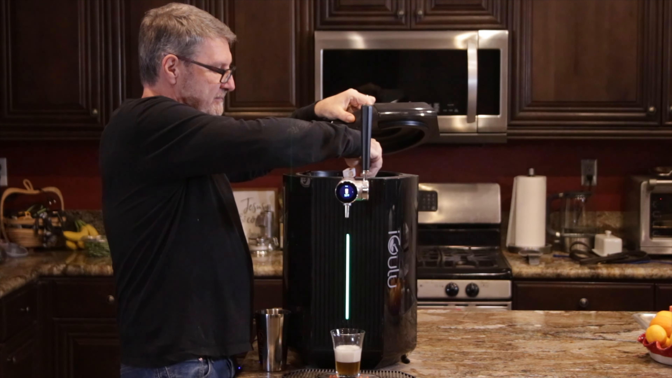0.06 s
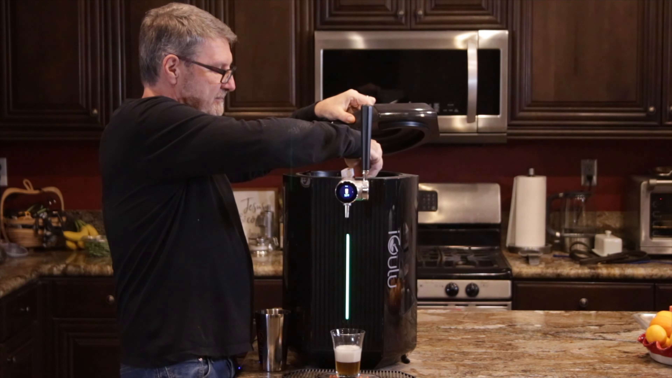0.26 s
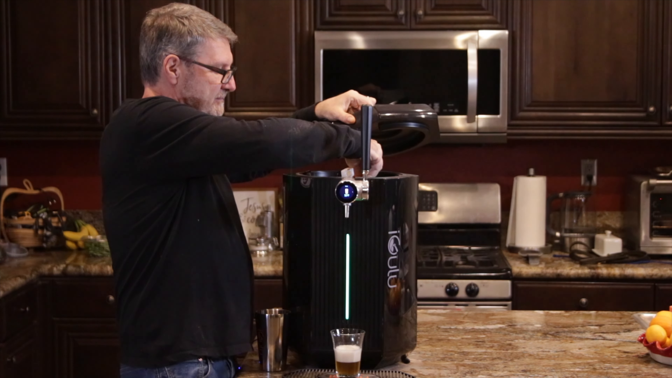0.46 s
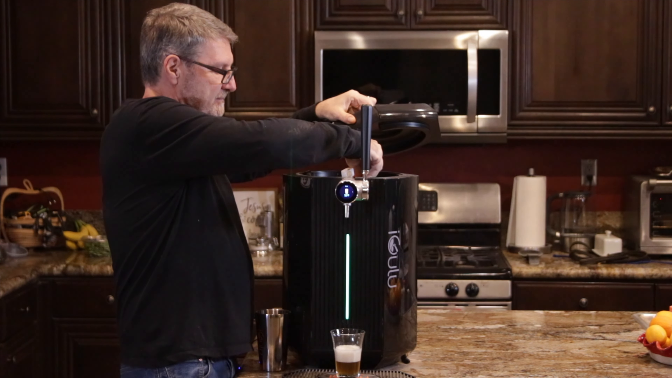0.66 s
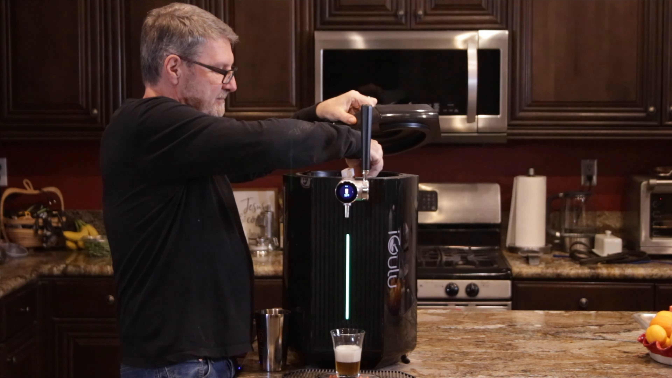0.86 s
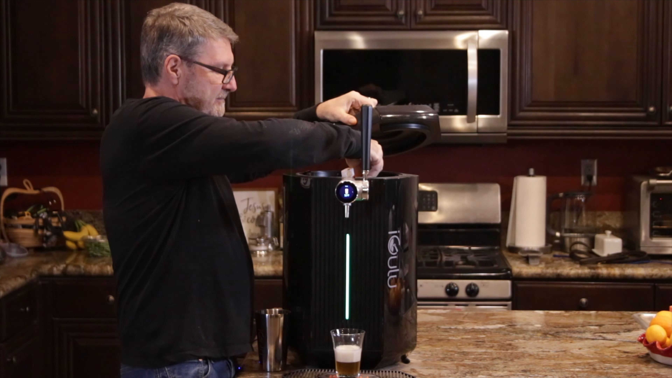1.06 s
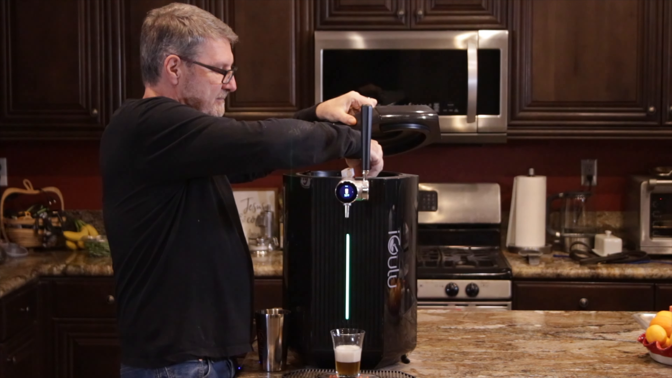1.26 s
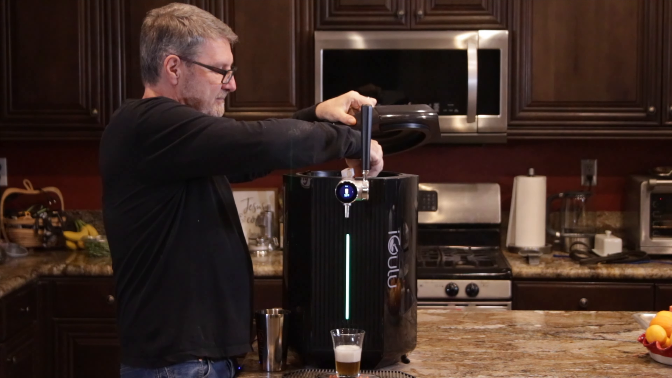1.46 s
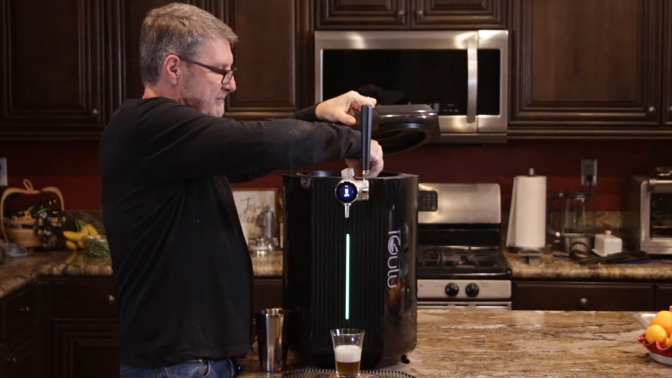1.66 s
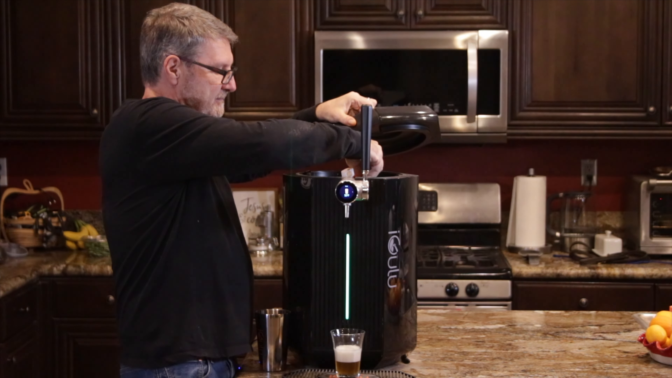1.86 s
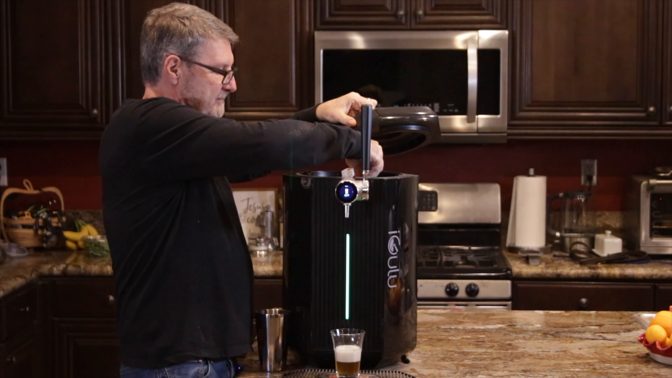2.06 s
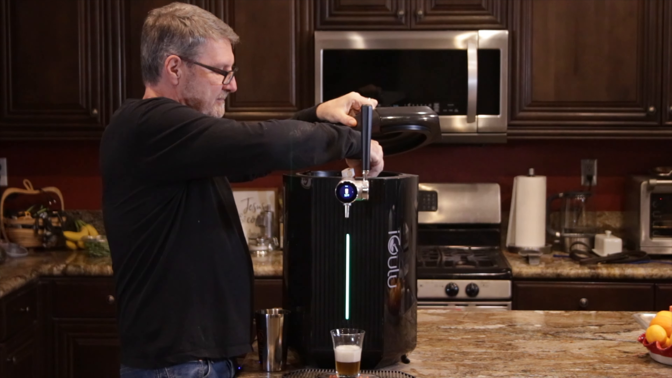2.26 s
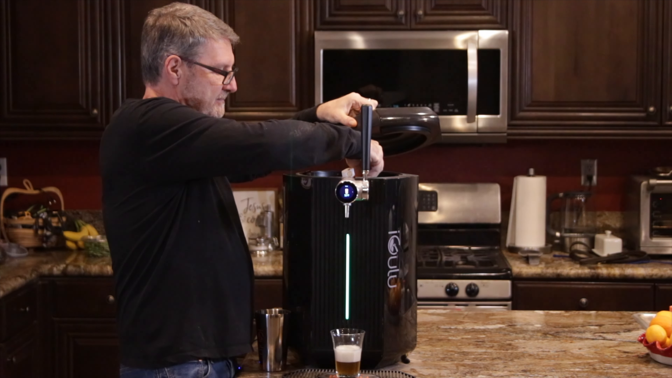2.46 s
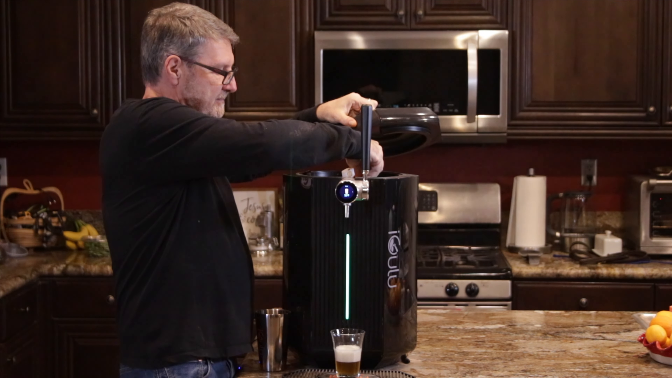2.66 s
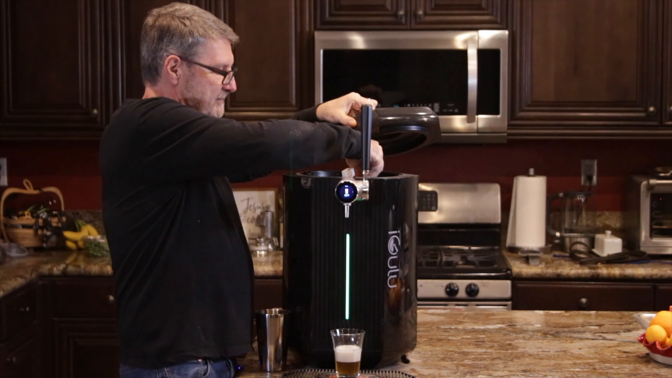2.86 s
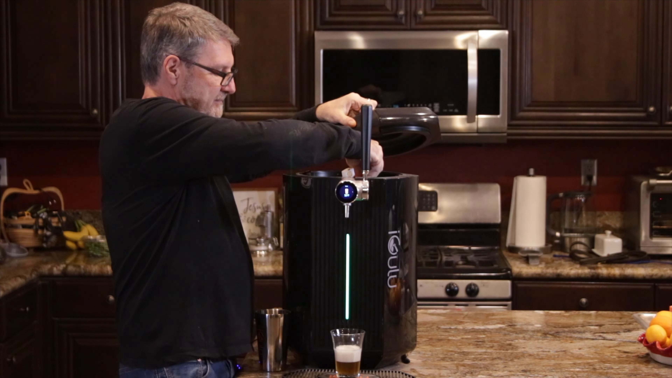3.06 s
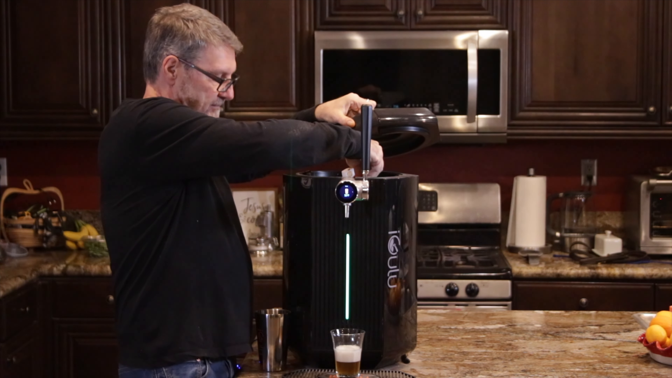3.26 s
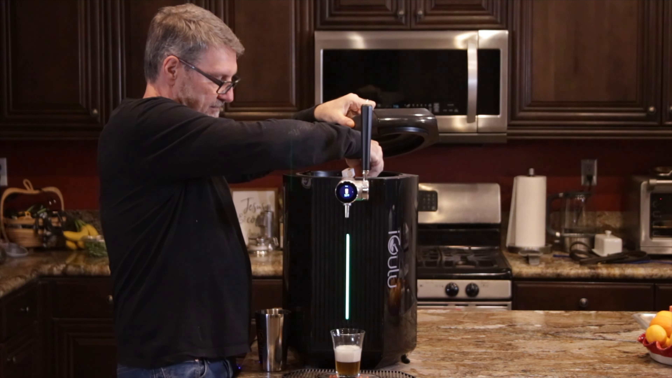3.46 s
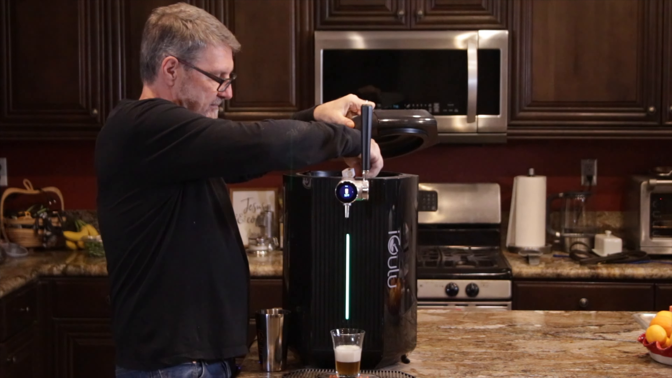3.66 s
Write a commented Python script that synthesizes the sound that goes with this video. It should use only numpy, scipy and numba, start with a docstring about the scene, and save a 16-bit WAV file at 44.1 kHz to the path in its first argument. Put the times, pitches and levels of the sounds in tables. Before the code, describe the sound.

Pressurised gas hisses from a keg tap. After faint hand rustle, it bursts out at about 0.2 s with a soft thump and spitting drops, then rushes bright and dense, slightly fluttering. Low foam churns beneath with a hollow ring; a thin wavering note faintly emerges after 1 s. Treble fades until the hiss shuts off near 3.45 s, followed by rustle, a dull thump at 3.6 s and quiet kitchen tone.

```python
"""Pressurised gas escapes from the tap of a brewing keg in a kitchen: it swells, spurts, hisses for three seconds and shuts off.
The jet is flickering noise and droplet clicks, strongest between 3.7 and 5.2 kHz in the valve band;
its treble fades as the pressure sinks, while a few high bands brighten in turn and stray drops spit.
Under it foam churns as low noise, a hollow resonance sounds and a thin wavering sine grows out of it.
Damped swings thump as the tap opens and closes; a hand rustles, over room tone and a short echo tail."""
import sys
import numpy as np
from scipy import signal
from scipy.fft import rfft, irfft
from scipy.io import wavfile
from scipy.ndimage import uniform_filter1d
from numba import njit

SR = 44100
rng = np.random.default_rng(int(sys.argv[2]) if len(sys.argv) > 2 else 0)


def int16_out(signal):
    """Quantize to a 16-bit WAV file."""
    q = np.round(np.clip(np.atleast_2d(signal).T, -1, 1) * 32767)
    wavfile.write(sys.argv[1], SR, q.astype(np.int16))


N = 163170
T = np.arange(N) / SR
HZ = np.maximum(np.fft.rfftfreq(N, 1 / SR), 1)
CUT_HZ = 15500

# background hiss of the room, relative spectrum [f/Hz, level/dB]
ROOM_TONE_COLOUR = [(76, -33), (130, -3), (361, -2), (487, -9), (756, -7), (2060, -13), (4670, -11),
                    (15500, -13)]
ROOM_TONE_START_DB, ROOM_TONE_RISE_DB_PER_S = -60, 0.5
RUMBLE_DB, RUMBLE_HZ = -74, 80

# low rustle of the hand on the tap [start t/s, end t/s, level/dB]
HAND_RUSTLES = [(0.0, .16, -67.5), (3.535, 3.677, -57)]
HANDLING_LOW_HZ, HANDLING_HIGH_HZ = 45, 149

# strength of the jet [t/s, valve band level/dB, treble level/dB before trim, top treble level/dB]
JET_LEVELS = [(0.14, -66, -69, -66), (0.17, -45, -62, -61), (0.21, -25, -27, -32), (0.22, -22, -22.5, -26),
              (0.24, -23, -29.5, -29), (0.35, -24.5, -27.5, -29), (0.38, -25, -30, -31),
              (0.42, -22, -27, -28.5), (0.48, -25, -29, -30), (0.67, -23.5, -28.5, -29.5),
              (0.76, -25, -28.5, -32.5), (2.02, -25, -31, -37.5), (2.45, -26.5, -33.5, -42.5),
              (2.49, -27.5, -34, -44), (2.5, -26.5, -34, -43.5), (2.78, -29, -37, -46.5),
              (3.33, -32.5, -41.5, -51.5), (3.44, -31, -42.5, -48), (3.47, -46, -60, -62),
              (3.5, -55, -60, -65)]
TREBLE_TRIM_DB = -0.5
# relative spectrum of the valve band, then of the spray above it [f/Hz, level/dB]
VALVE_SPECTRUM = [(650, -66), (1100, -30), (1330, -23), (1960, -22), (3660, -2.5), (4270, -2), (4550, -1),
                  (5150, 0), (5800, -7), (7540, -31), (12800, -120)]
SPRAY_SPECTRUM = [(3240, -31), (5500, -1.5), (8780, -5.5), (10400, -5.5), (14700, -7.5), (15500, -12)]
# resonances of the tap [centre f/Hz, half width f/Hz, lift level/dB]
TAP_RESONANCES = [(2870, 90, 3), (3100, 110, 2), (3800, 200, 2.5), (4620, 130, 4), (5030, 110, 1.5),
                  (6230, 110, 2.5), (6550, 110, 2), (7100, 160, 2), (7540, 130, 4), (8300, 180, 3),
                  (9620, 200, 4), (10080, 110, 2.5), (10480, 140, 5), (10850, 220, 3.5), (12250, 200, 3),
                  (12840, 160, 3), (13300, 200, 3.5), (14550, 360, 3.5)]
VALVE_EDGE_HZ, SPRAY_SPLIT_HZ = 5170, 10250
# rms depth and rate of the quick flutter, the slower surges and the drift of narrow spray bands
FLUTTER_DB, FLUTTER_PER_S = 0.57, 90
SURGE_DB, SURGE_PER_S = 0.5, 22
WANDER_DB, WANDER_PER_S = 0.5, 2.38
# dense droplet clicks: mean rate, spread of sizes, level against the rushing noise
CLICKS_PER_S, CLICK_SPREAD_DB, CLICK_DB = 900, 3, -11
# stray loud drops [t/s, noise level at onset/dB]
LOUD_SPITS = [(0.215, -13), (0.221, -12), (.305, -12.5), (.434, -17), (1.307, -24), (1.879, -17),
              (1.929, -23)]
SPIT_DECAY_S, SPIT_SPRAY_DB = 0.0012, -9

# churning foam [t/s, level/dB before trim]
FOAM_LEVELS = [(0.17, -64), (0.19, -68), (0.22, -43), (0.27, -49), (0.97, -53.5), (2.09, -49), (3.45, -52),
               (3.48, -56), (3.63, -61), (3.68, -72)]
# relative spectrum of the foam [f/Hz, level/dB]
FOAM_SPECTRUM = [(65, -21), (110, -6), (160, -6.5), (219, -6.5), (315, -3), (390, -5), (677, -8),
                 (730, -6.5), (828, -4.5), (1060, -11.5), (2200, -13), (2860, -34), (4840, -120)]
FOAM_TRIM_DB, FOAM_LOW_HZ, FOAM_TOP_HZ = 2.5, 103, 2120
GURGLE_DB, GURGLE_PER_S = 0.73, 35
# hollow resonance of the spout [t/s, centre f/Hz, width f/Hz, level/dB]
SPOUT_RESONANCE = [(.17, 920, 170, -71), (.22, 890, 170, -43), (.5, 920, 173, -45.5),
                   (1.3, 890, 162, -47.5), (1.9, 906, 140, -51), (2.6, 880, 140, -58), (3.4, 860, 120, -64),
                   (3.7, 845, 100, -74)]

# soft thumps of the tap [t/s, level/dB before doubling and panning, pitch f/Hz, decay t/s]
TAP_THUMPS = [(.205, -35, 45, 0.0059), (0.224, -36, 31.8, 0.0068), (3.601, -43, 28, 0.01),
              (3.671, -55, 45, .008)]
KNOCK_DB, KNOCK_HZ, KNOCK_DECAY_S = -14, 400, 0.017  # knock level is relative to its thump
THUMP_PAN_DB = 11  # left over right

# spray bands that swell and fade [brightest t/s, spread t/s, centre f/Hz, spread f/Hz, level/dB]
SIZZLE_BANDS = [(.3, 0.4, 5160, 170, -31.5), (.45, .7, 10560, 220, -38), (2.0, 0.55, 10130, 601.9, -37.5)]
SIZZLE_OPEN_S = 0.22

# thin note that grows out of the hollow resonance [t/s, level/dB]
NOTE_LEVELS = [(1.0, -64), (1.9, -52.5), (2.3, -51.5), (3.28, -54.5), (3.38, -60), (3.7, -62)]
NOTE_HZ, NOTE_WAVER_HZ, NOTE_WAVER_PER_S, NOTE_FLICKER_DB = 839, 5, 20, 2

# last gas seeping through the closing valve [t/s, level/dB]
SEEP_LEVELS = [(3.44, -47), (3.485, -55), (3.515, -54), (3.53, -58)]
# resonances of the nearly shut passage [centre f/Hz, width f/Hz]
PASSAGE_RESONANCES = [(3750, 220), (4060, 140), (4590, 180)]

KITCHEN_T60_S, KITCHEN_DB = 0.18, -15.5


def undb(db):
    """Turn decibels into gain."""
    return 10 ** (np.asarray(db) / 20)


def unit(x):
    """Scale to rms 1."""
    return x / np.sqrt(np.mean(x ** 2))


def shape(x, gain):
    """Filter by a gain for each frequency."""
    return irfft(rfft(x) * gain, N)


def colour(points):
    """Gain for each frequency, drawn through (Hz, dB) points on a log frequency axis."""
    hz, db = np.array(points).T
    return undb(np.interp(np.log(HZ), np.log(hz), db))


def below(hz, order=12):
    """Low-pass gain."""
    return 1 / np.sqrt(1 + (HZ / hz) ** (2 * order))


def above(hz, order=12):
    """High-pass gain."""
    return 1 / np.sqrt(1 + (hz / HZ) ** (2 * order))


def walk(rate):
    """Random levels held for 1 / rate seconds, smoothed twice and scaled to rms 1."""
    hold = max(int(SR / rate), 1)
    held = rng.standard_normal(4096)[np.arange(N) // hold % 4096]
    smooth = uniform_filter1d(held, hold)
    return unit(uniform_filter1d(smooth, hold))


def fader(times, db, fall_db_per_s=400):
    """Gain along a level curve, falling away steeply outside it."""
    outside = np.maximum(times[0] - T, 0) + np.maximum(T - times[-1], 0)
    return undb(np.interp(T, times, db) - fall_db_per_s * outside)


def decay(start, seconds):
    """Sudden start and exponential fall."""
    return (T >= start) * np.exp(-np.maximum(T - start, 0) / seconds)


@njit
def resonate(x, hz, width):
    """Moving band-pass that keeps the power of noise steady as its width changes."""
    y, band, low = np.empty(len(x)), 0., 0.
    for i in range(len(x)):
        g = np.tan(np.pi * hz[i] / SR)
        damping = width[i] / hz[i]
        v = (band + g * (x[i] - low)) / (1 + g * (g + damping))
        band = 2 * v - band
        low = low + 2 * g * v
        y[i] = damping * v / np.sqrt(width[i])
    return y


def room_tone(side_db=-8, side_bass_db=-2, side_bass_hz=500):
    """Quiet hiss, a little wider above the bass and creeping up slowly, over a faint centred rumble."""
    mid = unit(shape(rng.standard_normal(N), colour(ROOM_TONE_COLOUR)))
    side = unit(shape(rng.standard_normal(N), colour(ROOM_TONE_COLOUR)))
    side = shape(side, undb(side_db + side_bass_db * below(side_bass_hz, order=2)))
    stereo = mid + side * np.array([[1], [-1]])
    rumble = unit(shape(rng.standard_normal(N), below(RUMBLE_HZ, order=2)))
    return undb(ROOM_TONE_START_DB + ROOM_TONE_RISE_DB_PER_S * T) * stereo + undb(RUMBLE_DB) * rumble


def handling():
    """The hand shifts on the tap with a dull rustle of low noise before and after the pour."""
    band = above(HANDLING_LOW_HZ, order=2) * below(HANDLING_HIGH_HZ, order=3)
    rustle = unit(shape(rng.standard_normal(N), band))
    return rustle * sum(fader([start, end], [db, db]) for start, end, db in HAND_RUSTLES)


def turbulence():
    """Rushing gas as white noise, mixed with dense clicks of bursting droplets."""
    clicks = (rng.random(N) < CLICKS_PER_S / SR) * rng.choice([-1, 1], N)
    sizes = undb(CLICK_SPREAD_DB * np.minimum(rng.exponential(size=N), 5))
    return unit(rng.standard_normal(N) + undb(CLICK_DB) * unit(clicks * sizes))


def wander(x, count=24):
    """Let neighbouring narrow bands swell and sink on their own."""
    step = CUT_HZ / count
    out = 0
    for k in range(count + 2):
        band = shape(x, np.maximum(1 - abs(HZ / step - k), 0))  # overlapping triangles
        out = out + band * undb(WANDER_DB * walk(WANDER_PER_S))
    return out


def spits(gain):
    """Stray drops burst as very short noise decays through the colour of the tap."""
    bursts = sum(undb(db) * decay(s, SPIT_DECAY_S) for s, db in LOUD_SPITS)
    return shape(bursts * rng.standard_normal(N), unit(gain))


def jet():
    """Fluttering turbulence rings the tap; valve band and two spray bands follow their own levels."""
    times, valve_db, treble_db, top_db = np.array(JET_LEVELS).T
    modes = undb(sum(db * np.exp(-((HZ - hz) / width) ** 2) for hz, width, db in TAP_RESONANCES))
    valve = colour(VALVE_SPECTRUM) * below(VALVE_EDGE_HZ) * above(920, order=6) * modes
    spray = colour(SPRAY_SPECTRUM) * above(VALVE_EDGE_HZ) * modes
    gas = unit(shape(turbulence(), valve))
    mist = wander(turbulence())
    treble = unit(shape(mist, spray * below(SPRAY_SPLIT_HZ, order=4) ** 2))
    top = unit(shape(mist, spray * above(SPRAY_SPLIT_HZ, order=4) ** 2))
    hiss = gas * fader(times, valve_db)
    hiss = hiss + treble * fader(times, treble_db + TREBLE_TRIM_DB)
    hiss = hiss + top * fader(times, top_db)
    unrest = undb(FLUTTER_DB * walk(FLUTTER_PER_S) + SURGE_DB * walk(SURGE_PER_S))
    return hiss * unrest + spits(valve + undb(SPIT_SPRAY_DB) * spray)


def foam():
    """Foam gurgles as low noise; noise in a moving band-pass gives the hollow ring that sinks and fades."""
    times, db = np.array(FOAM_LEVELS).T
    band = colour(FOAM_SPECTRUM) * above(FOAM_LOW_HZ, order=5) * below(FOAM_TOP_HZ, order=5)
    churn = unit(shape(turbulence(), band)) * fader(times, db + FOAM_TRIM_DB)
    at, hz, width, ring_db = np.array(SPOUT_RESONANCE).T
    ring = resonate(rng.standard_normal(N), np.interp(T, at, hz), np.interp(T, at, width))
    ring = unit(ring) * fader(at, ring_db)
    return (churn + ring) * undb(GURGLE_DB * walk(GURGLE_PER_S))


def thumps():
    """Each move of the tap gives a damped low swing, leaning left, and a dull centred knock of noise."""
    swings, knock_levels = 0, 0
    for s, db, hz, fall in TAP_THUMPS:
        swings = swings + undb(db) * decay(s, fall) * np.sin(2 * np.pi * hz * (T - s)) * 2
        knock_levels = knock_levels + undb(db + KNOCK_DB) * decay(s, KNOCK_DECAY_S)
    knock = unit(shape(rng.standard_normal(N), below(KNOCK_HZ, order=2)))
    pan = undb(np.array([[THUMP_PAN_DB], [-THUMP_PAN_DB]]) / 2)
    return swings * pan + knock_levels * knock


def sizzle():
    """Single high bands of the spray brighten for a while, once the valve is open."""
    out = 0
    for peak, length, hz, width, db in SIZZLE_BANDS:
        band = unit(shape(turbulence(), np.exp(-((HZ - hz) / width) ** 2 / 2)))
        out = out + band * undb(db) * np.exp(-((T - peak) / length) ** 2 / 2)
    return out * fader([SIZZLE_OPEN_S, JET_LEVELS[-1][0]], [0, 0])


def note():
    """A faint sine, wavering in pitch and level, sings in the spout as the flow calms."""
    phase = 2 * np.pi * np.cumsum(NOTE_HZ + NOTE_WAVER_HZ * walk(NOTE_WAVER_PER_S)) / SR
    tone = np.sin(phase) * undb(NOTE_FLICKER_DB * walk(NOTE_WAVER_PER_S))
    return unit(tone) * fader(*np.array(NOTE_LEVELS).T)


def seep():
    """The nearly shut valve rings briefly, noise passing through its narrow resonances."""
    passage = sum(1 / (1 + (2 * (HZ - hz) / width) ** 2) for hz, width in PASSAGE_RESONANCES)
    return unit(shape(rng.standard_normal(N), passage)) * fader(*np.array(SEEP_LEVELS).T)


def kitchen(x):
    """A short tail of decaying noise from cupboards and counter, centred like the keg."""
    t = T[:SR // 2]
    tail = rng.standard_normal(SR // 2) * undb(-60 * t / KITCHEN_T60_S)
    tail = tail * (t > .003)  # gap before the first reflections
    return x + undb(KITCHEN_DB) * signal.fftconvolve(x, tail / np.linalg.norm(tail))[:N]


def scene():
    """Gas and foam sound in the kitchen; handling, thumps and room tone are added without its tail."""
    keg = jet() + foam() + sizzle() + note() + seep()
    return room_tone() + handling() + kitchen(keg) + thumps()


def record(dry):
    """A steep elliptic low-pass cuts the top."""
    return signal.sosfilt(signal.ellip(10, .2, 80, CUT_HZ, fs=SR, output="sos"), dry)


dry = scene()
out = record(dry)
int16_out(out)
```